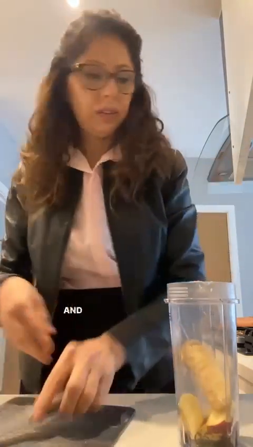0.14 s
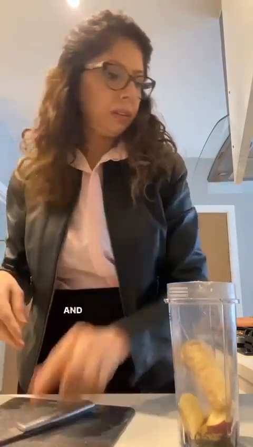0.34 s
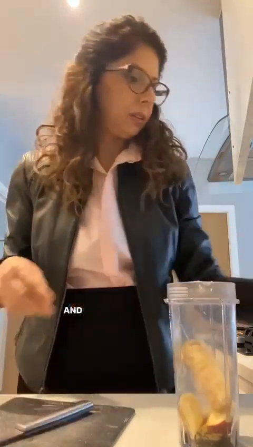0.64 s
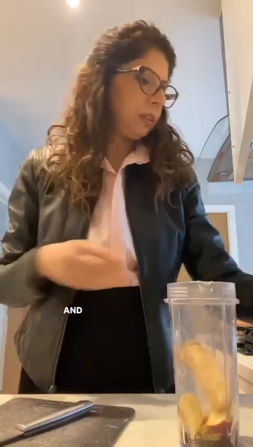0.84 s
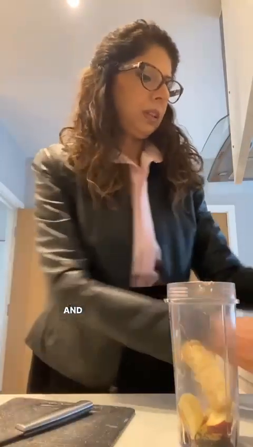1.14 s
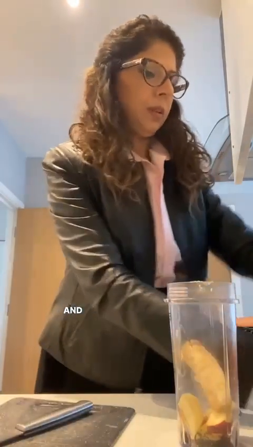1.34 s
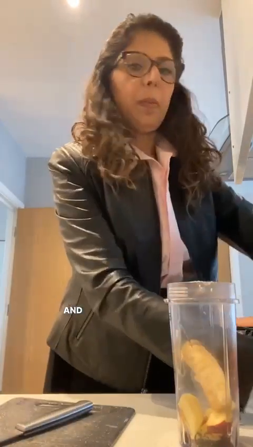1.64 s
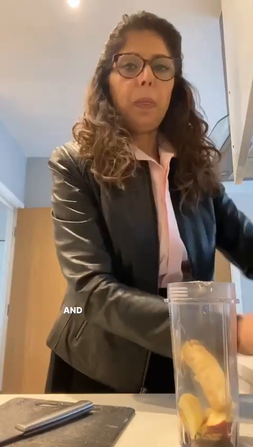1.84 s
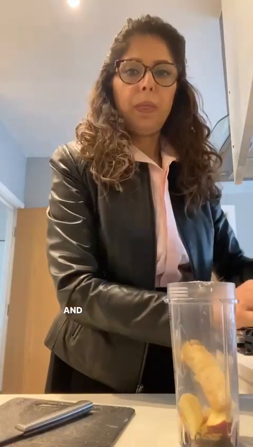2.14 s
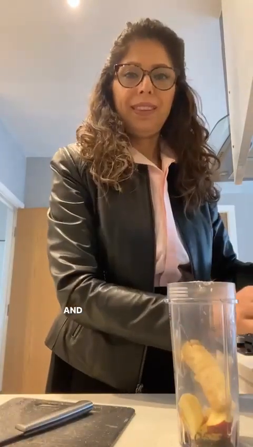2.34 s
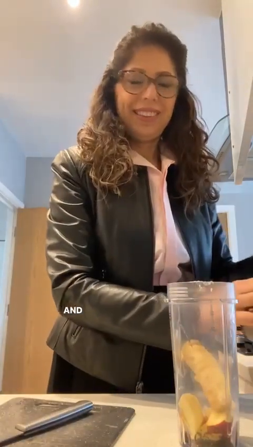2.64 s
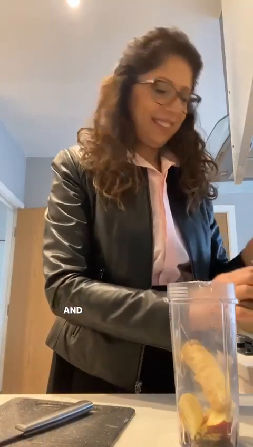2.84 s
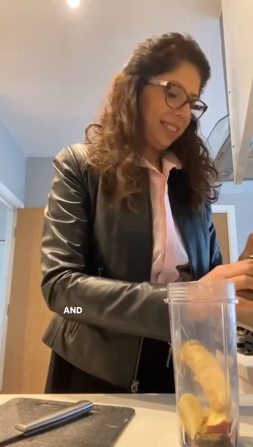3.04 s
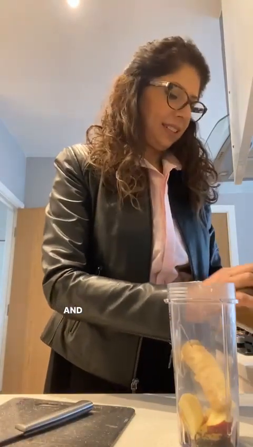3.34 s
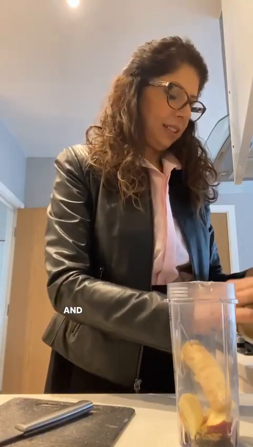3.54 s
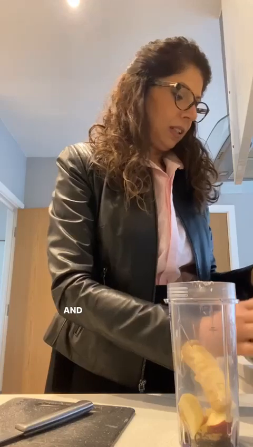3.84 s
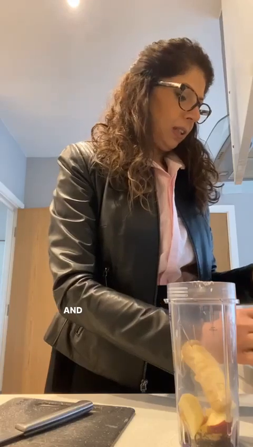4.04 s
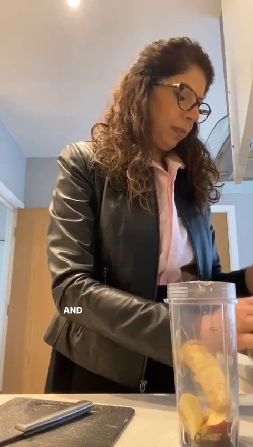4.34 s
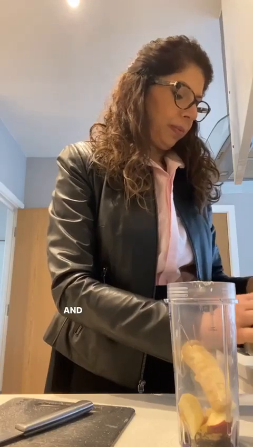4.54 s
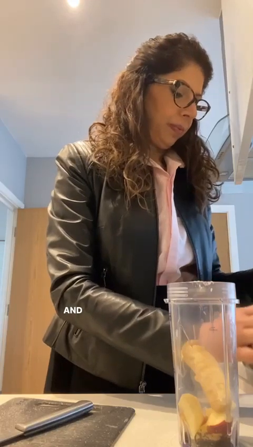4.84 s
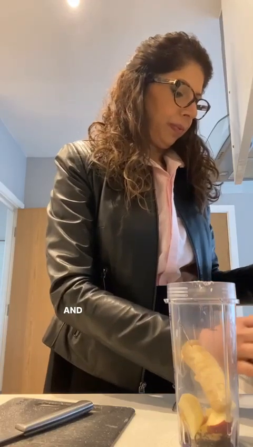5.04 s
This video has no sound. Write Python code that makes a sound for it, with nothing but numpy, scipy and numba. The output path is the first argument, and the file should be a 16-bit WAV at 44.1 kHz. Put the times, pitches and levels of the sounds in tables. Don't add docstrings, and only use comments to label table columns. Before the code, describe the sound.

A woman's kitchen movements heard up close: leather jacket rustling, a knife laid down with quick woody knocks, then a jar set on stone with dull knocks and crisp taps. Midway a loud glass-and-metal clink rings, a lid ticks and squeaks on its thread, quieter touches follow, then another ringing clink and a last spoon rattle. Short bright room tail, level ducking after clinks, distant low fridge rumble.

```python
import sys
import numpy as np
from scipy import signal
from scipy.fft import rfft, irfft, next_fast_len
from scipy.io import wavfile
from scipy.ndimage import uniform_filter1d, minimum_filter1d
from numba import njit

SR = 44100
rng = np.random.default_rng(int(sys.argv[2]) if len(sys.argv) > 2 else 0)


def generate_wav(signal):
    frames = np.transpose(np.atleast_2d(signal))
    scaled = np.clip(frames, -1, 1) * 32767
    pcm = np.round(scaled).astype(np.int16)
    wavfile.write(sys.argv[1], SR, pcm)


def field_ratio(decibels):
    return 10 ** (np.asarray(decibels, dtype=float) / 20)


N = 228066
TIME = np.arange(N) / SR

# (frequency [Hz], density [dB per Hz])
HISS_SPECTRUM = [(1470, -39), (2500, -4.5), (4920, -1), (6720, 5.5), (9900, 5), (11800, 0.5), (12300, -9.5),
                 (12700, -26.5), (16400, -67), (22000, -120)]
METAL_LINGER, WOOD_LINGER = 0.27, 0.2
HARD_RISE_S = 0.0015

WOBBLE_HOLD = SR // 150
WOBBLE = np.repeat(rng.spawn(1)[0].standard_normal((2, 2000)), WOBBLE_HOLD, axis=1)
WOBBLE = 1.3 * uniform_filter1d(uniform_filter1d(WOBBLE, WOBBLE_HOLD), WOBBLE_HOLD)


def band(x, lo_hz, hi_hz, order=2):
    sos = signal.butter(order, [lo_hz, min(hi_hz, 0.45 * SR)], "bandpass", fs=SR, output="sos")
    return signal.sosfilt(sos, x)


def low_pass(x, top_hz):
    return signal.sosfilt(signal.ellip(12, 0.2, 100, top_hz, fs=SR, output="sos"), x)


def unit(x):
    return x / np.sqrt(np.mean(x ** 2))


def coloured(points):
    hz, db = np.transpose(points)
    size = next_fast_len(N)
    log_hz = np.log(np.fft.rfftfreq(size, 1 / SR) + 1)
    gain = field_ratio(np.interp(log_hz, np.log(hz), db, left=-90, right=-90))
    return unit(irfft(rfft(rng.standard_normal(size)) * gain, size)[:N])


def walk(rate):
    hold = int(SR / rate)
    steps = np.repeat(rng.standard_normal(N // hold + 1), hold)
    return unit(uniform_filter1d(uniform_filter1d(steps, hold), hold)[:N])


def swells(moments, rise_s, fall_s):
    gain = 0
    for s, db in moments:
        gain = gain + field_ratio(db) * np.exp(np.where(TIME < s, (TIME - s) / rise_s, (s - TIME) / fall_s))
    return gain


def inside(start, stop):
    return uniform_filter1d(1. * (TIME > start) * (TIME < stop), size=256)


def add(out, s, sound):
    i = int(s * SR)
    out[i:i + len(sound)] += sound[:N - i]


def fridge():
    # (frequency [Hz], density [dB per Hz])
    hum_spectrum = [(15, -65), (25, -43.5), (41, -18.5), (64, 6.5), (91, -9.5), (119, 2.5), (140, -9.5),
                    (211, -15.5), (259, -13), (300, -22.5), (390, -24), (660, -120)]
    return field_ratio(-57 + 4.0 * walk(30)) * coloured(hum_spectrum)


def rustle():
    # (time [s], level [dB])
    motion = [(0.0, -48), (0.24, -52), (0.69, -55.5), (0.85, -58), (1.05, -41), (1.41, -48), (1.8, -43.5),
              (2.09, -53), (2.32, -52.5), (2.56, -43), (2.92, -55.5), (3.2, -57), (3.59, -50), (3.7, -57),
              (4.29, -71), (4.68, -40), (4.81, -64.5), (5.17, -74)]
    # (time [s], level [dB])
    finger_rubs = [(0.01, -52), (0.24, -52), (1.01, -55.5), (1.12, -39.5), (1.41, -51), (1.67, -48),
                   (1.8, -42), (2.45, -50), (3.08, -41), (5.16, -54)]
    # (time [s], level [dB])
    sleeve_brushes = [(0.01, -58.5), (0.36, -56), (0.92, -49.5), (1.28, -43.5), (1.54, -51), (1.75, -57),
                      (2.72, -79), (3.4, -61.5), (4.68, -71.5)]
    motion_db = np.interp(TIME, *np.transpose(motion))
    above_rest_db = motion_db + 70.5
    rub_gain = field_ratio(-72.5 + 0.37 * above_rest_db) + swells(finger_rubs, rise_s=0.011, fall_s=0.014)
    brush_gain = field_ratio(-65.5 + 0.096 * above_rest_db) + swells(sleeve_brushes, rise_s=0.045, fall_s=0.079)
    creaks = field_ratio(1.4 * rng.exponential(size=N)) * (rng.random(N) < 0.01)
    leather = coloured(HISS_SPECTRUM) * (1 + 0.8 * uniform_filter1d(creaks, size=24))
    fingers = band(rng.standard_normal(N), 1200, 7400)
    sleeve = band(rng.standard_normal(N), 330, 550, order=1)
    out = np.zeros(N)
    for part, gain in ((leather, field_ratio(motion_db)), (fingers, rub_gain), (sleeve, brush_gain)):
        out += gain * field_ratio(2.0 * walk(25.18)) * unit(part)
    return out


def kitchen(x):
    # (centre [Hz], t60 [s], level [dB])
    room_bands = [(208, 0.18, -0.5), (780, 0.32, -10), (1740, 0.35, -6.5), (3400, 0.64, -15),
                  (5100, 0.78, -24.5), (9900, 0.36, -2)]
    t = np.arange(SR) / SR
    flutter_s = 0.023
    flutter = 1 + field_ratio(0.5) * (t > flutter_s) * np.exp(-np.abs(t - flutter_s) / 0.0025)
    tail = 0
    for hz, t60, db in room_bands:
        noise = unit(band(rng.standard_normal(len(t)), hz / 1.77, hz * 1.554))
        fading = noise * np.exp(-np.log(1000) * t / t60)
        tail = tail + field_ratio(db - 38.5) * fading * (1 - np.exp(-t / 0.00043))
    return signal.fftconvolve(x, tail * flutter)[:N]


def ring(hz, db, t60, rise_s, linger, place, waver=1, pace=1):
    i = np.arange(int(2 * max(t60) * SR))
    t = i / SR
    fall = -np.log(1000) * t / t60[:, None]
    unsteady = waver * WOBBLE[:, place[:, None] + pace * i] * (1 - np.exp(-t / 0.007))
    level_wobble, phase_wobble = unsteady
    slow = linger * np.exp(fall / 1.6) * field_ratio(5.0 * level_wobble)
    fast = 0.9 * np.exp(2.2 * fall)
    tones = np.sin(2 * np.pi * hz[:, None] * t + 0.9 * phase_wobble)
    return (field_ratio(db) @ ((slow + fast) * tones)) * (1 - np.exp(-t / rise_s))


def strike(families, levels_db, damping, spot_db, detune, rise_s, linger):
    hz, db, t60 = np.concatenate(families).T
    spot = rng.standard_normal((2, len(hz)))
    strength = np.repeat(levels_db, [len(f) for f in families]) + db + spot_db * spot[0]
    place = (np.abs(spot[1]) * 1e3 % 1 * N).astype(int)
    t60 = np.clip(t60 * damping, 0.005, 1)
    return ring(hz * (1 + detune * spot[1]), strength, t60, rise_s, linger, place)


def crack(db, lo_hz, hi_hz, decay_s, seed):
    t = np.arange(len(seed)) / SR
    return field_ratio(db) * unit(band(seed, lo_hz, hi_hz)) * np.exp(-t / decay_s)


def knocks(blows, families, ring_s, spot_db, top_hz, rise_s, grit_db):
    out = np.zeros(N)
    for s, body_db, thump_db, edge_db, crack_db in blows:
        levels_db = np.array([body_db, thump_db, edge_db]) - 2.0
        add(out, s, strike(families, levels_db, ring_s, spot_db, 0.021, rise_s, WOOD_LINGER))
        seed = rng.standard_normal(2048)
        snap = crack(crack_db - 0.5, 5100, top_hz, 0.0077, seed)
        grit = crack(edge_db + grit_db, 950, 2600, 0.011, seed)
        add(out, s, snap + grit)
    return out


def knife_and_spoon():
    # (frequency [Hz], level [dB], share of the ring time)
    board_modes = [
        [(510, -2, .8), (570, 0, .8), (800, -6, .6), (950, -6, .6)],
        [(70, -8, 2.5), (105, 0, 2.5), (133, -3, 1.3), (195, -8, 1.1), (250, -2, 1.3)],
        [(1170, -15, .3), (1500, 0, .35), (1850, 0, .35), (2120, -4, .3), (2450, -5, .3), (2800, -1, .4),
         (3370, -4, .3), (4200, -4, .25), (5000, 0, .3)],
    ]
    # (time [s], body [dB], thump [dB], edge [dB], crack [dB])
    tip_knocks = [
        (0.192, -31, -48, -15, -21.5),
        (0.217, -34.5, -43, -21, -30.5),
    ]
    handle_knocks = [
        (0.308, -6.5, -18.5, -16.5, -22),
        (0.317, -30, -12.5, -10.5, -12),
        (0.344, -23, -13, -42.5, -21.5),
        (0.358, -18, -24, -27, -22.5),
        (0.383, -24, -33, -54, -32.5),
    ]
    # (time [s], edge [dB], crack [dB])
    spoon_knocks = [
        (5.026, -24, -19),
        (5.0353, -18, -17),
        (5.04, -24, -19),
        (5.0617, -28, -28),
    ]
    spoon = [(s, snap - 18, snap - 26.5, edge, snap) for s, edge, snap in spoon_knocks]
    return (knocks(tip_knocks, board_modes, 0.13, 0.99, 9300, HARD_RISE_S, grit_db=-51)
            + knocks(handle_knocks, board_modes, 0.063, 2.9, 9300, HARD_RISE_S, grit_db=-6)
            + knocks(spoon, board_modes, 0.051, 0.89, 21700, HARD_RISE_S, grit_db=-15.5))


def jar_on_counter():
    # (frequency [Hz], level [dB], share of the ring time)
    stone_modes = [
        [(375, -2, 0.52), (387.6, -5, 0.73), (459, 2.5, 0.73), (544, 1.5, 0.34), (640, -11.5, 0.44)],
        [(242, 0.0082, 1.2), (340, 0.0051, 1.1)],
        [(915, 7.5, 0.44), (767, 1.5, 0.7), (1020, -13, .4), (1250, 1, .6), (1454, -0.5, 0.5),
         (1780, -10, 0.48), (2053, -13.5, 0.87)],
    ]
    # (time [s], body [dB], edge [dB])
    base_knocks = [(0.788, -50, -50.5), (0.885, -39, -38.5), (0.964, -33, -27), (1.102, -7.5, -11.5),
                   (1.111, -10.5, -32), (1.136, -16.5, -21), (1.15, -17.5, -41.5), (1.165, -35.5, -40.5),
                   (1.122, -30, -33), (1.209, -32, -49.5), (1.615, -34, -35.5), (2.031, -56, -47.5),
                   (2.389, -69, -54.5), (2.444, -48, -50.5), (2.486, -43, -81), (2.56, -55, -53),
                   (2.949, -44.5, -49), (3.078, -47, -53), (4.177, -70.5, -62), (4.311, -57, -55.5),
                   (4.427, -40.5, -48)]
    rim_settles = [
        (0.838, -31.5, -57),
        (1.44, -23.5, -43),
        (1.465, -20.5, -38.5),
        (1.514, -26.5, -40.5),
        (1.543, -21, -53),
        (1.572, -24, -40),
    ]

    def full(rows):
        return [(s, body, body - 21.5, edge, edge - 29.5) for s, body, edge in rows]

    return (knocks(full(base_knocks), stone_modes, 0.11, 2.2, 12000, HARD_RISE_S, grit_db=-14.5)
            + knocks(full(rim_settles), stone_modes, 0.081, 3.1, 9800, 0.0041, grit_db=-14.5))


def laid_down():
    return band(knife_and_spoon() + jar_on_counter(), 91, 18000)


def ticks(snaps):
    out = np.zeros(N)
    for s, db, hz in snaps:
        seed = rng.standard_normal(2048)
        resonance = crack(db - 13.5, 0.64 * hz, 1.15 * hz, 0.0047, seed)
        add(out, s, resonance + crack(db - 22.5, 2200, 17000, 0.017, seed))
    return out


def unechoed_ticks():
    # (time [s], level [dB], centre [Hz])
    dry_snaps = [(3.353, -53, 7040), (3.733, -39, 8950), (3.745, -37, 9300), (3.787, -43, 9000),
                 (4.855, -46, 6520), (5.068, -18, 5950), (1.518, -12, 6500), (1.6195, -0.5, 7000),
                 (1.626, -10.5, 6000), (1.637, -11, 8630), (1.655, -22, 8500), (2.4842, 0.5, 6470),
                 (2.488, -0.5, 6500), (4.437, -5.5, 6000), (2.95, -12, 4970), (2.958, -15, 4500),
                 (3.082, -20, 4500), (1.795, -40, 6000)]
    return ticks(dry_snaps)


def thread_and_zip():
    # (time [s], level [dB], centre [Hz])
    teeth_ticks = [(0.923, -21.5, 9620), (0.9322, -19, 7600), (2.917, -30.5, 6500), (3.3654, -47, 7950),
                   (3.659, -42, 9470), (1.2891, -8.5, 8100), (1.297, -5, 9250), (1.321, -23, 7240),
                   (1.7894, -56.5, 6510), (2.289, -28, 8300), (2.394, -32.5, 3050), (3.279, -35, 4570),
                   (3.4154, -37, 2200), (4.1623, -54, 4570), (4.3112, -35, 7470), (4.842, -35.5, 8500),
                   (4.863, -28.5, 8400)]
    return ticks(teeth_ticks)


def squeaks():
    # (start [s], slip [s], frequency at slip [Hz], start level [dB], slip level [dB])
    lid_turns = [
        (2.823, 2.943, 7480, -58.5, -32.5),
        (3.09, 3.272, 6700, -48.5, -34),
        (3.287, 3.407, 6830, -62.5, -30),
    ]
    # (ratio to the main line, level [dB])
    thread_lines = [
        (1, 0),
        (1.27, -23),
        (1.59, -14),
        (1.77, -14.5),
    ]
    out = np.zeros(N)
    narrow = band(rng.standard_normal((2, N)), 5.1, 120)
    scrape = unit(band(coloured(HISS_SPECTRUM), 4600, 13000))
    for start, slip, slip_hz, start_db, slip_db in lid_turns:
        hz = slip_hz - 600 * np.clip(slip - TIME, 0, slip - start)
        phase = 2 * np.pi * np.cumsum(hz) / SR
        lines = 0
        for k, (ratio, over_db) in enumerate(thread_lines):
            a, b = np.roll(narrow, k * SR // 3, axis=1)
            lines = lines + field_ratio(over_db) * unit(a * np.cos(ratio * phase) + b * np.sin(ratio * phase))
        db = np.interp(TIME, [start, slip], [start_db, slip_db])
        db = db - 900 * np.clip(TIME - slip, 0, 1)
        out += field_ratio(db) * (TIME > start) * (0.53 * lines + field_ratio(-8) * scrape)
    return out


def pings():
    # (time [s], level [dB], frequency [Hz], t60 [s])
    hard_pings = [(.193, -30, 4850, .04), (.886, -46, 1850, .03), (.9655, -40, 1850, .03),
                  (1.512, -31, 10000, .06), (1.515, -24, 4800, .04), (1.514, -25, 6565, .06),
                  (1.54, -43, 6600, .2), (1.513, -26, 8500, .04), (1.6148, -21, 11540, .035),
                  (1.6153, -27, 8510, .06), (2.4838, -20, 5730, .045), (2.4843, -27, 4465, .055),
                  (2.4846, -25, 8350, .05), (2.486, -24, 6160, .12), (2.49, -23, 4800, .22),
                  (2.935, -44, 7480, .05), (2.9481, -32, 6260, .085), (2.966, -36, 2700, .08),
                  (2.966, -38, 4850, .06), (2.9482, -26.5, 2590, .05), (3.0773, -42, 2840, .06),
                  (3.745, -61, 4880, .1), (3.7455, -61, 9200, .04), (3.7459, -53, 6260, .053),
                  (3.787, -58, 4800, .06), (3.7875, -61, 9600, .03), (3.9155, -60, 4470, .22),
                  (3.9157, -64, 3400, .15), (3.9158, -61, 4950, .07), (3.9159, -60, 9500, .04),
                  (3.9161, -62, 7900, .05), (3.9165, -58, 6200, .15), (4.1637, -59, 4465, .17),
                  (4.1639, -62, 3410, .05), (4.1641, -63, 7860, .05), (4.1643, -62, 4925, .06),
                  (5.027, -31, 9550, .04), (5.0272, -33, 4900, .015), (5.036, -35, 4800, .015),
                  (5.037, -31, 9560, .06)]
    soft_pings = [(.199, -38, 105, .25), (.2, -41, 2720, .053), (.201, -37, 545, .06),
                  (.222, -41, 2770, .063), (.225, -38, 545, .11), (.309, -27, 850, .03),
                  (.386, -35, 520, .04), (.865, -47, 4850, .03), (.886, -43, 482, .098),
                  (.965, -35, 468, .078), (.9654, -40, 3370, .07), (1.1011, -40.5, 3380, .13),
                  (1.104, -26, 243, .15), (1.2295, -41.5, 3390, .2), (2.245, -61.5, 4530, .17),
                  (3.222, -37, 6780, .06), (3.227, -32, 6760, .05), (3.262, -47, 10700, .03),
                  (3.262, -44, 11900, .04), (3.2635, -29, 6740, .033), (3.3842, -30, 6770, .03),
                  (3.353, -44, 6800, .04), (3.368, -42, 6800, .05), (3.394, -44, 11200, .028),
                  (3.396, -33, 6750, .03), (3.388, -34, 6800, .04), (3.402, -32, 6780, .04),
                  (3.51, -64, 2690, .15), (3.659, -51.5, 5680, .04), (3.6592, -51, 10600, .032)]
    # (time [s], level [dB], frequency
    # [Hz], t60 [s])
    clear_pings = [(.33, -38, 64.5, 0.6), (.352, -29, 108, 0.38), (.973, -42, 477, 0.13),
                   (1.103, -27, 845, .1), (1.112, -31, 700, 0.12), (1.125, -30, 911, .15),
                   (1.137, -21, 455.2, .22), (1.149, -24, 456.5, 0.22), (1.165, -37, 827, 0.18),
                   (1.578, -50.5, 8500, 0.12), (1.6148, -17, 4450, 0.056), (1.6149, -15.5, 6567, 0.05),
                   (1.617, -20.5, 4780, 0.074), (1.633, -22, 6560, 0.11), (1.6335, -31, 7890, .04),
                   (2.24, -55.5, 6550, .4), (2.287, -49, 7950, .02), (2.35, -56, 7500, .12),
                   (2.4843, -13.5, 7610, 0.068), (2.4844, -17.5, 5980, 0.076), (2.4845, -23, 2689, 0.19),
                   (2.4846, -31, 6565, .09), (2.4847, -22.5, 8750, 0.043), (2.487, -16, 4900, .08),
                   (2.488, -45.5, 1250, .12), (2.506, -16, 4820, .03), (3.082, -34.5, 2690, 0.13),
                   (3.085, -42.5, 4830, 0.099), (4.4287, -22.5, 9890, 0.11), (4.431, -15, 6580, 0.065),
                   (4.432, -14.5, 4910, 0.13), (4.433, -26, 7210, 0.049), (4.448, -28.5, 2681, 0.29),
                   (5.0271, -33.5, 8500, .015), (5.036, -41, 8500, 0.013), (5.039, -41, 2250, 0.053),
                   (5.128, -53, 1200, 0.018)]
    hanging_tones = [(2.5, -42, 2630, 0.46), (2.5, -45, 2740, .45), (2.51, -39.5, 4770, 0.6),
                     (2.52, -48, 3100, 0.46), (2.52, -44, 5500, .35), (2.96, -45, 2760, 0.38),
                     (2.55, -49, 7420, 0.57), (4.45, -40, 2750, 0.58), (4.45, -42.5, 2610, .55),
                     (4.46, -38, 4888, .6), (4.46, -41.5, 4800, .55), (4.5, -46, 7200, 0.67),
                     (4.5, -47, 6100, 0.55), (4.43, -33.5, 4530, 0.088), (4.17, -67, 4465, .25)]
    out = np.zeros(N)
    for touches, rise_s, linger, waver, pace in ((hard_pings, 0.0017, METAL_LINGER, 1, 1),
                                                 (soft_pings, 0.0013, METAL_LINGER, 1, 1),
                                                 (clear_pings, 0.0012, 0.15, 0.6, 1),
                                                 (hanging_tones, 0.015, 0.45, 1.1, 2)):
        for s, db, hz, t60 in touches:
            place = np.array([int(s * SR + hz)])
            sound = ring(np.array([hz]), np.zeros(1), np.array([t60]), rise_s, linger, place, waver, pace)
            add(out, s, field_ratio(db + 9.0) * sound / np.abs(sound).max())
    return out


def jar(blows, lid_mid_db, damping, spot_db, crack_db, rise_s):
    # (frequency [Hz], level [dB], t60 [s])
    jar_modes = [
        [(6560, 0, .1), (6630, -5, .1), (7440, -2, .13), (8510, -7, .07), (9000, -11, .05), (9570, -8, .06),
         (9950, -5, .07), (11500, -10, .035)],
        [(2520, -8, .06), (2630, -5, .1), (2685, 0, .125), (2760, -6, .09)],
        [(3330, -7, .06), (3380, -1, .125)],
        [(4650, -8, .05), (4750, -2, .09), (4850, -3, .09), (4925, 0, .11)],
        [(5680, 0, .09), (5750, -2, .08), (8000, -9, .07), (10650, -3, .07)],
    ]
    out = np.zeros(N)
    for s, high_db, low_db, mid_db, lid_db in blows:
        body_db = np.array([low_db, lid_db, mid_db, lid_db + lid_mid_db])
        levels_db = np.array([high_db - 3, *(body_db + 6)])
        add(out, s, strike(jar_modes, levels_db, damping, spot_db, 0.0015, rise_s, METAL_LINGER))
        snap_db = max(high_db, max(body_db) - 4.5) + crack_db
        add(out, s, crack(snap_db, 4400, 9000, 0.0098, rng.standard_normal(2048)))
    return out


def held_jar():
    # (time [s], bright modes [dB], glass low [dB], glass mid [dB], lid [dB])
    hand_taps = [(0.8848, -50, -37.5, -54.5, -50.5), (0.9654, -49, -30.5, -48.5, -44.5),
                 (1.1011, -24.5, -42, -40, -39), (1.2307, -45, -64, -48.5, -47),
                 (1.508, -18, -26.5, -25, -35.5), (1.5125, -16.5, -27, -19, -33.5),
                 (1.6146, -11.5, -29, -16.5, -16.5), (1.6315, -16, -53.5, -36, -19.5),
                 (2.8394, -44, -92, -75, -77), (3.916, -43, -66, -57.5, -67), (4.1645, -49, -72, -76, -64)]
    soft_grazes = [(0.8612, -18.5, -34, -40, -44), (1.0659, -36, -59, -47, -44),
                   (1.4527, -35, -39, -47, -37), (1.4706, -35, -58, -42, -52),
                   (2.2422, -44, -43.5, -65, -60), (2.25, -52, -63, -48, -59.5),
                   (2.8744, -51, -62, -48, -41), (3.0346, -65, -36, -47, -66),
                   (3.5094, -46, -55, -58.5, -63), (3.5455, -37, -61, -46, -51),
                   (3.655, -68, -51, -62, -65), (3.7827, -66, -53, -62, -62.5)]
    loose_clinks = [
        (2.9481, -30, -33.5, -27, -37),
        (2.952, -30.5, -28, -28.5, -32),
        (3.0773, -31, -35.5, -40, -45),
    ]
    return (jar(hand_taps, 5.5, 0.5, 3.1, -7.0, 0.00068)
            + jar(soft_grazes, 2, 0.46, 1.2, -41.5, 0.014)
            + jar(loose_clinks, -9, 1, 1.1, -7.0, 0.00028))


def raised_jar():
    # (time [s], bright modes [dB], glass low [dB], glass mid [dB], lid [dB])
    free_blows = [
        (2.4842, -6, -24.5, -16, -21),
        (2.489, -6.5, -26, -28, -27),
        (2.5215, -43, -34, -36.5, -41),
        (4.4285, -6, -26, -20.5, -23),
        (4.4318, -14.5, -26, -17, -32.5),
    ]
    return jar(free_blows, -9, damping=0.7, spot_db=0.8, crack_db=-6, rise_s=0.00072)


def scene():
    raised = raised_jar()
    held = held_jar() + pings() + thread_and_zip() + squeaks()
    laid = laid_down()
    walls = kitchen(raised + field_ratio(-7.0) * held + field_ratio(-5.5) * laid)
    return (raised + held + laid + walls + rustle() + fridge() + unechoed_ticks())[None]


@njit
def follow(x, attack, release):
    out, e = np.empty(len(x)), 0.
    for i in range(len(x)):
        e += (abs(x[i]) - e) * (attack if abs(x[i]) > e else release)
        out[i] = e
    return out


def limit(x, ceiling):
    headroom = minimum_filter1d(np.minimum(1, ceiling / (np.abs(x) + 1e-9)), size=129)
    return x * uniform_filter1d(headroom, size=129)


def roll_off(x):
    return signal.sosfilt(signal.butter(12, 12780, fs=SR, output="sos"), x)


def record(dry):
    heard = follow(band(dry[0], 2400, 17000), 1 / (0.075 * SR), 1 / (0.07 * SR))
    gain = np.minimum(1, field_ratio(-45.5) / (heard + 1e-9)) ** 0.3
    bottom = signal.butter(3, 45, "highpass", fs=SR, output="sos")
    mix = limit(signal.sosfilt(bottom, dry * gain), 0.86)
    return roll_off(mix)


dry = scene()
out = record(dry)
generate_wav(out)
```